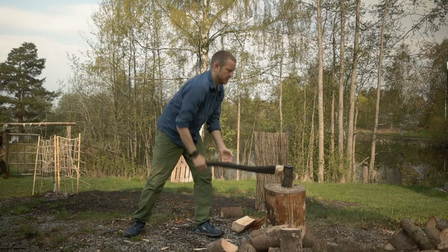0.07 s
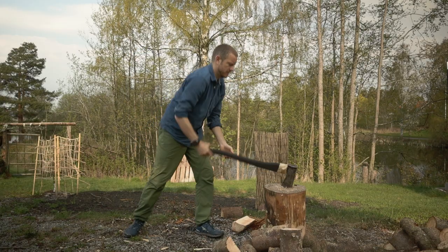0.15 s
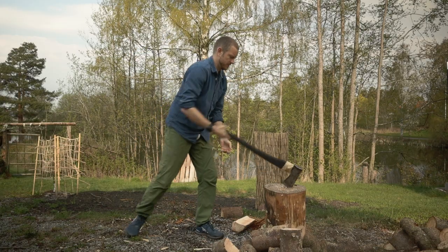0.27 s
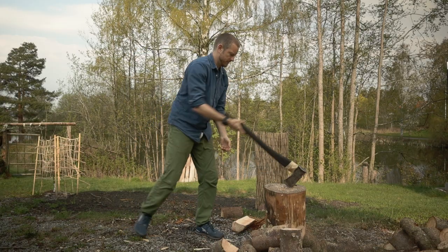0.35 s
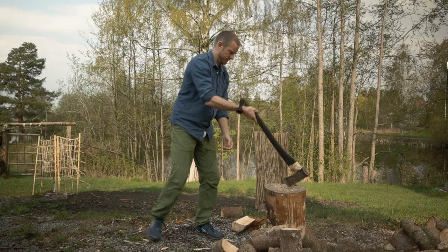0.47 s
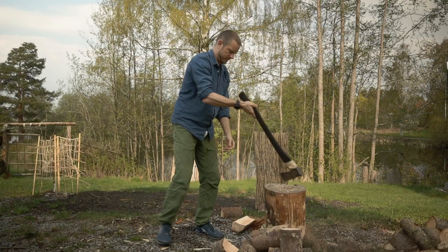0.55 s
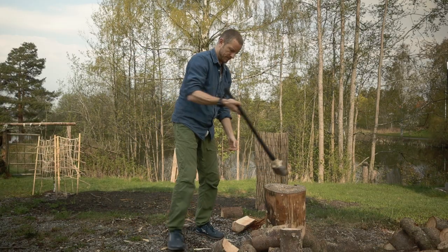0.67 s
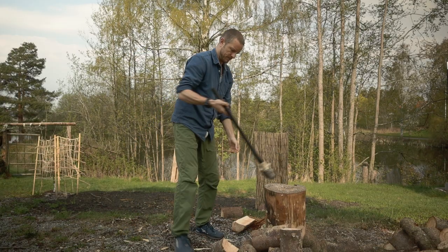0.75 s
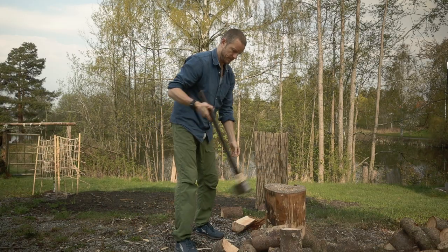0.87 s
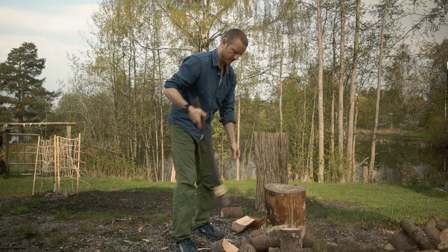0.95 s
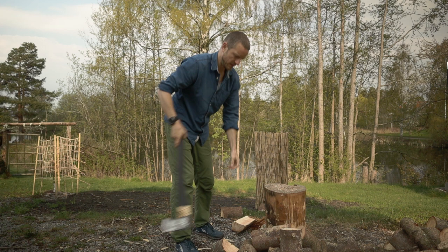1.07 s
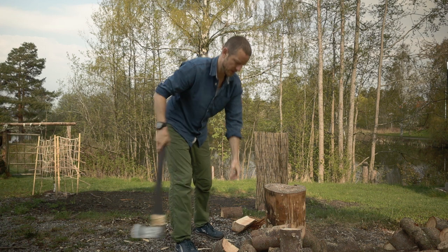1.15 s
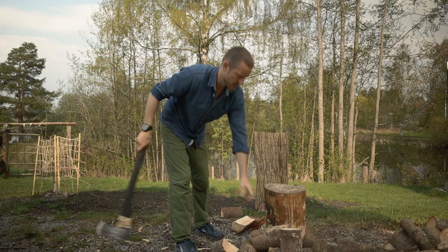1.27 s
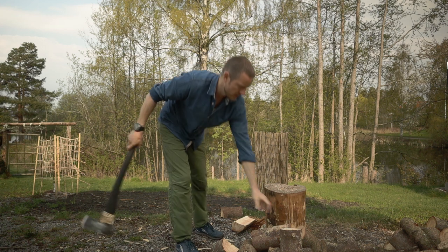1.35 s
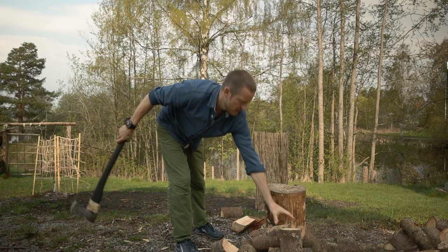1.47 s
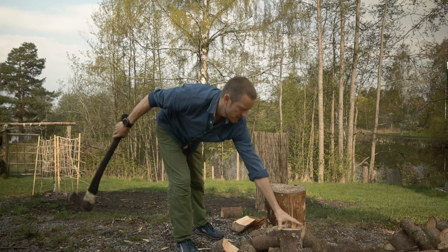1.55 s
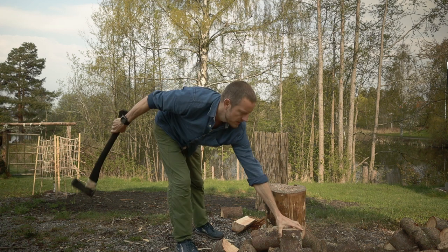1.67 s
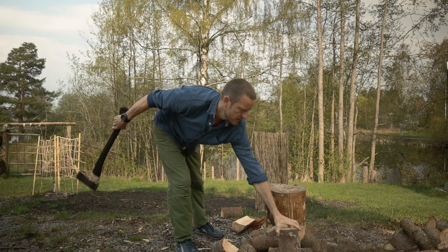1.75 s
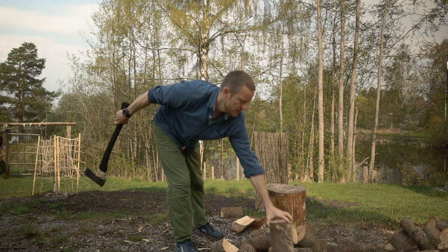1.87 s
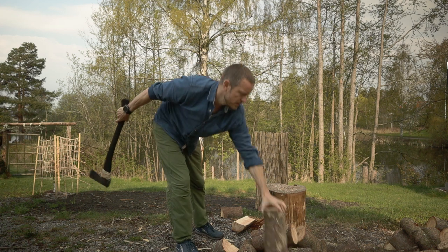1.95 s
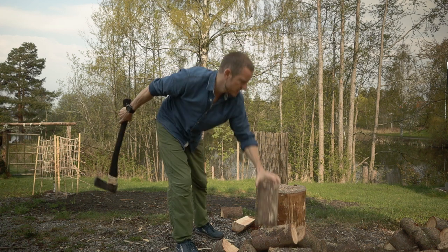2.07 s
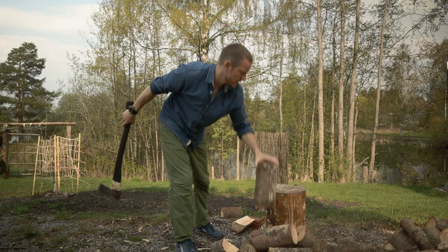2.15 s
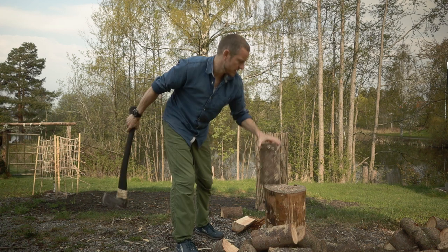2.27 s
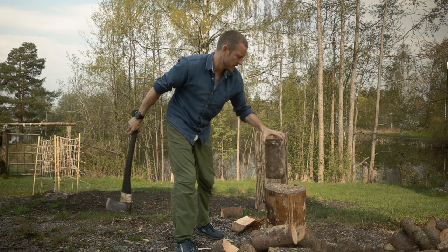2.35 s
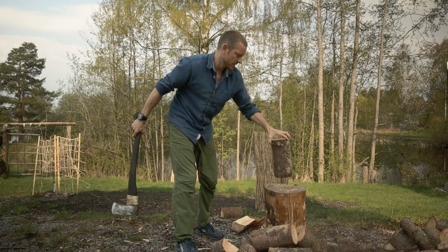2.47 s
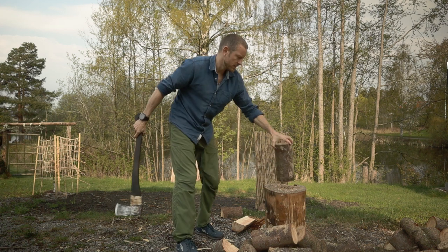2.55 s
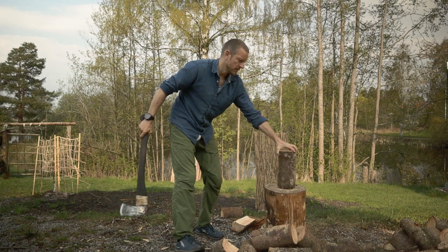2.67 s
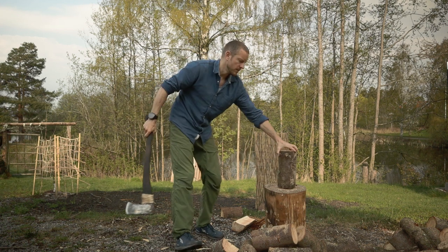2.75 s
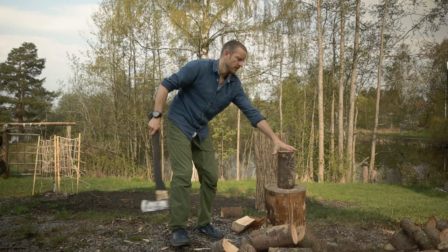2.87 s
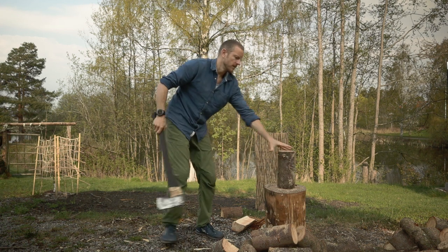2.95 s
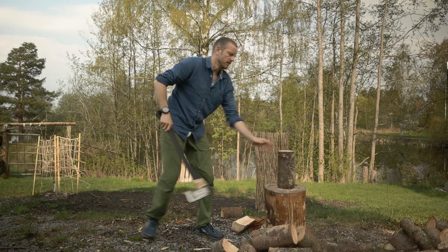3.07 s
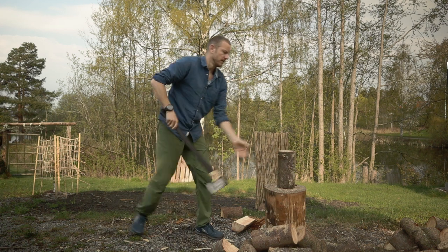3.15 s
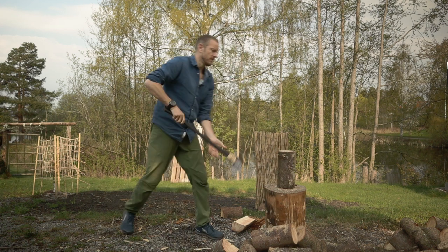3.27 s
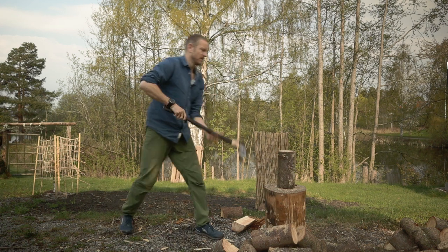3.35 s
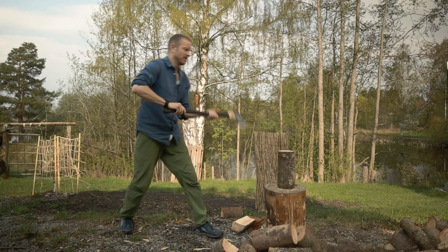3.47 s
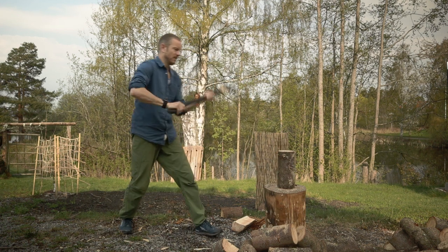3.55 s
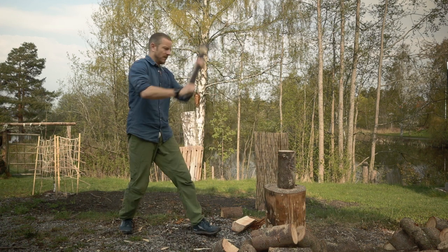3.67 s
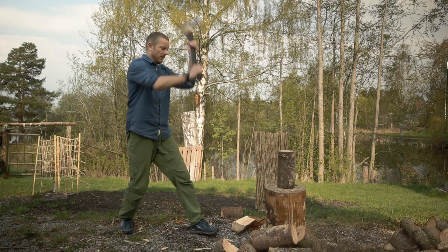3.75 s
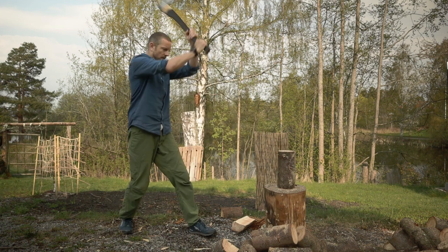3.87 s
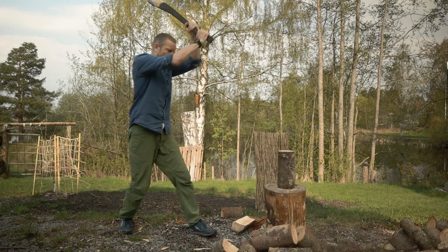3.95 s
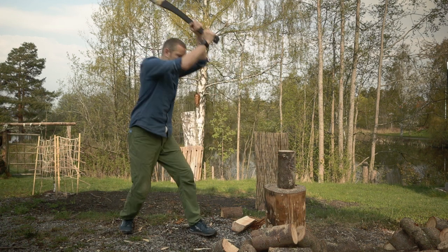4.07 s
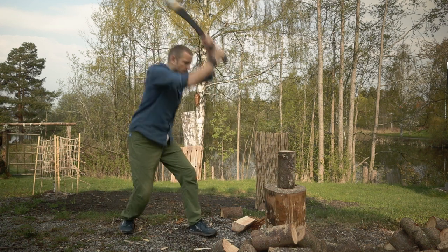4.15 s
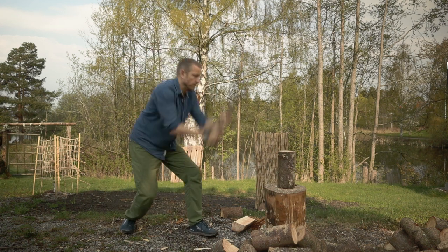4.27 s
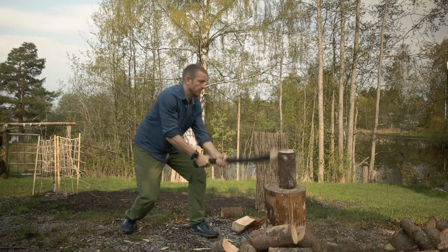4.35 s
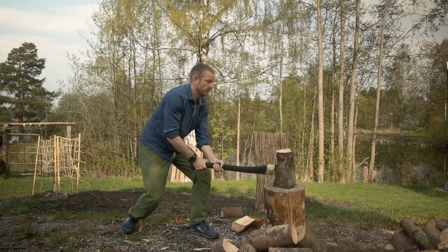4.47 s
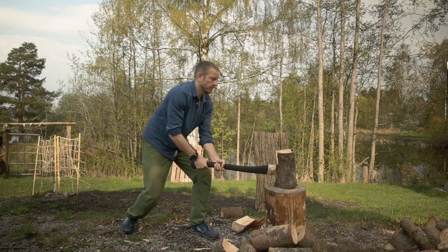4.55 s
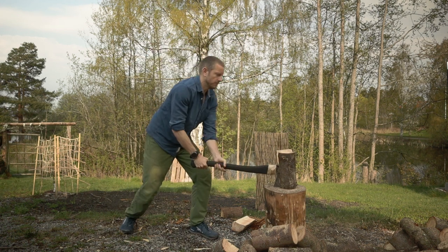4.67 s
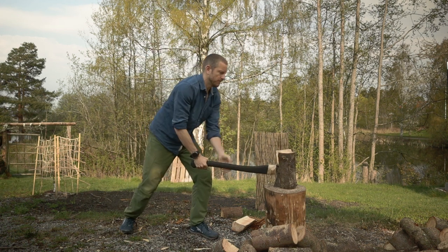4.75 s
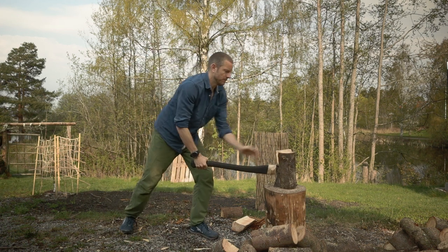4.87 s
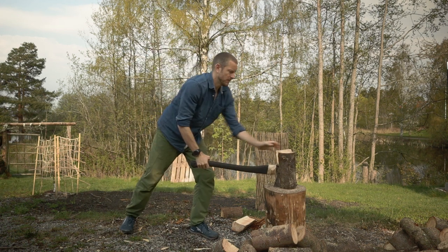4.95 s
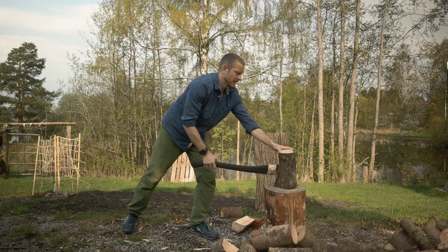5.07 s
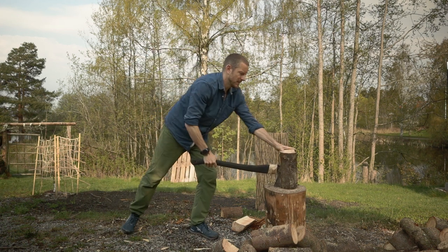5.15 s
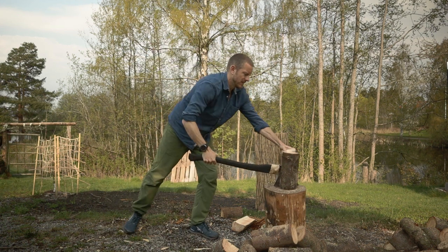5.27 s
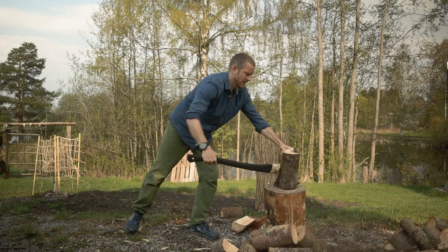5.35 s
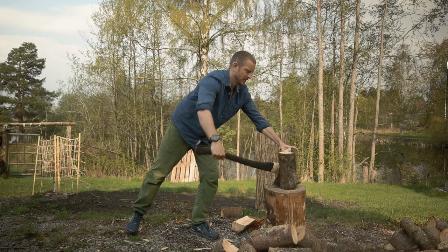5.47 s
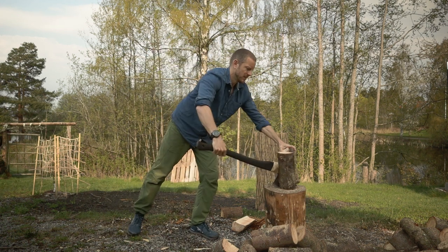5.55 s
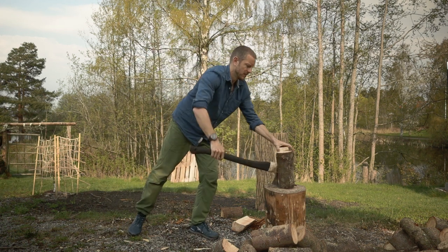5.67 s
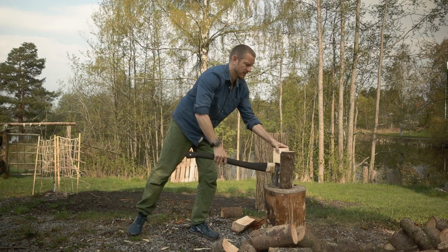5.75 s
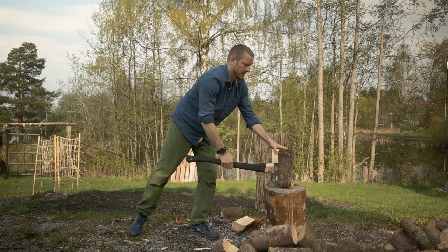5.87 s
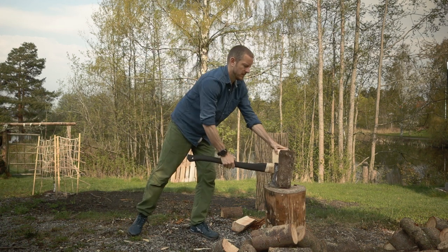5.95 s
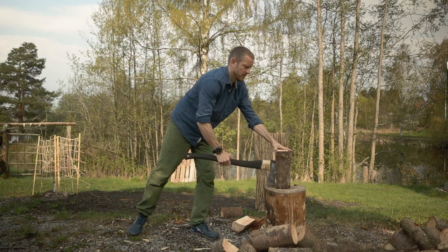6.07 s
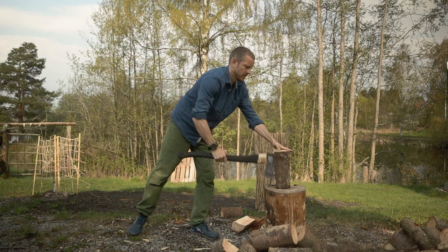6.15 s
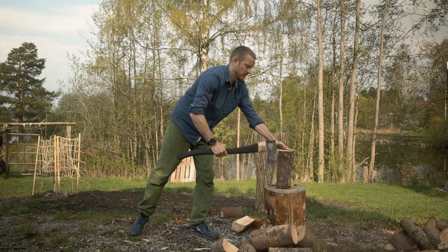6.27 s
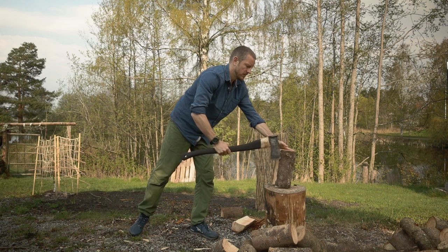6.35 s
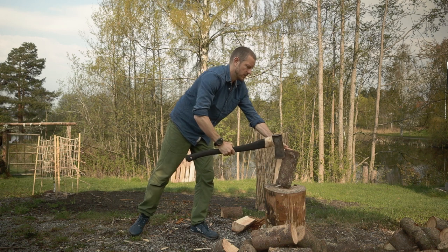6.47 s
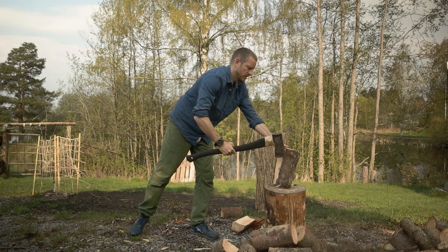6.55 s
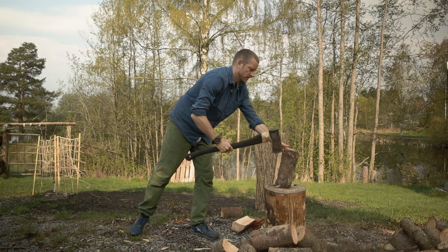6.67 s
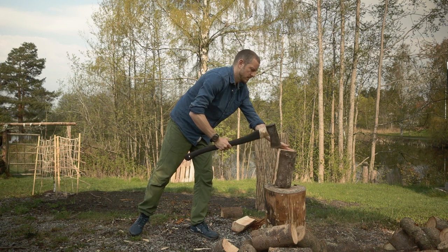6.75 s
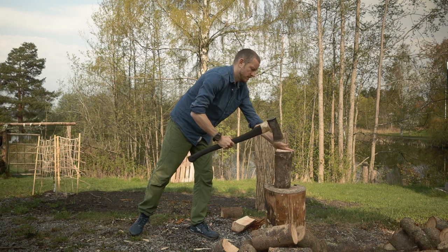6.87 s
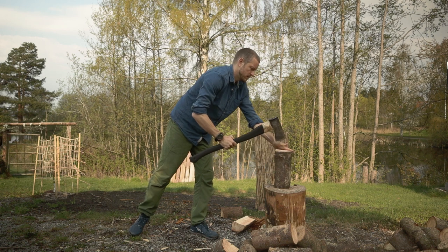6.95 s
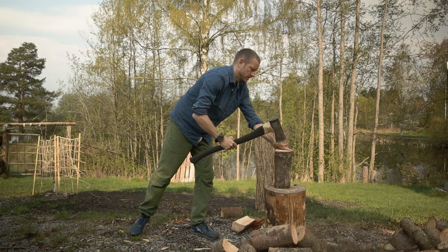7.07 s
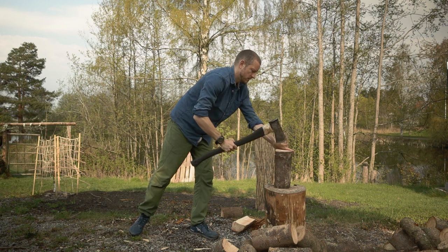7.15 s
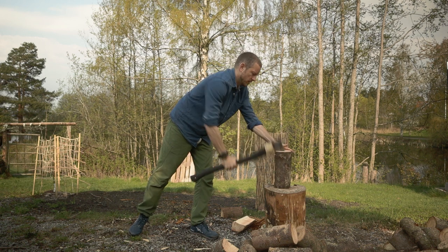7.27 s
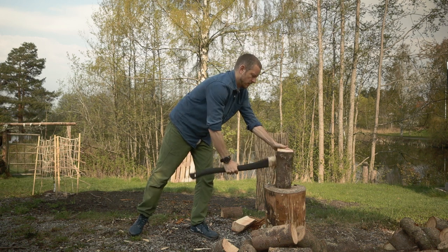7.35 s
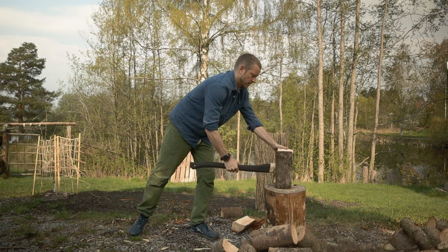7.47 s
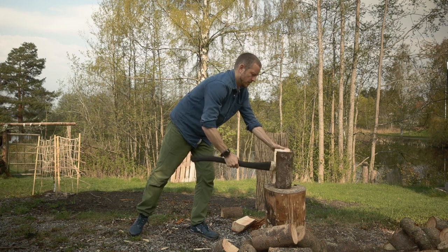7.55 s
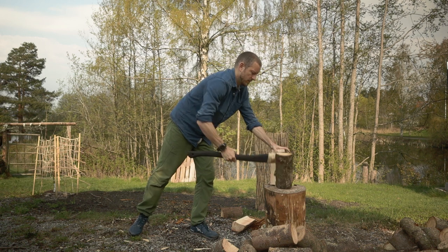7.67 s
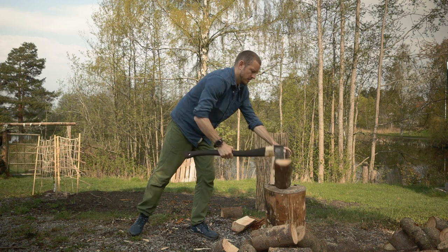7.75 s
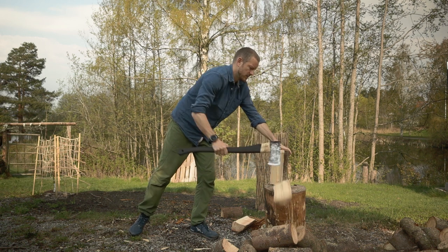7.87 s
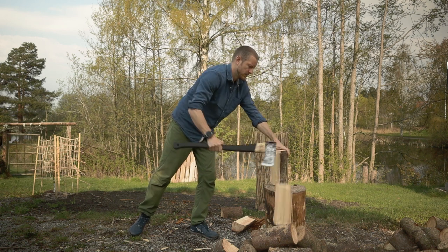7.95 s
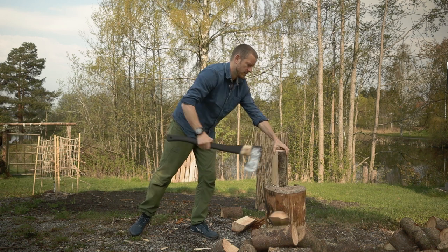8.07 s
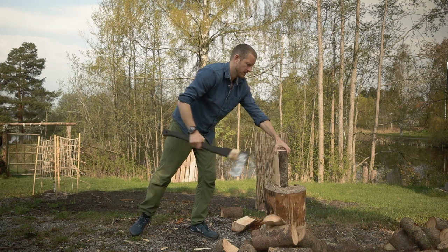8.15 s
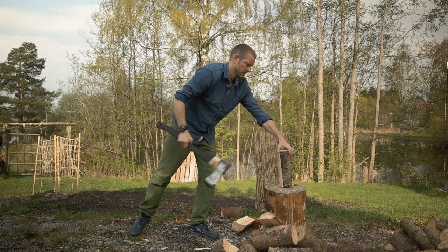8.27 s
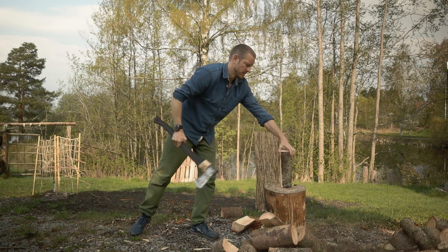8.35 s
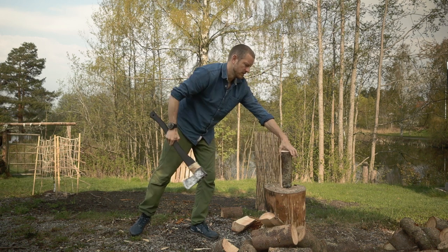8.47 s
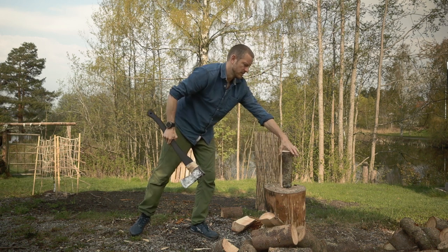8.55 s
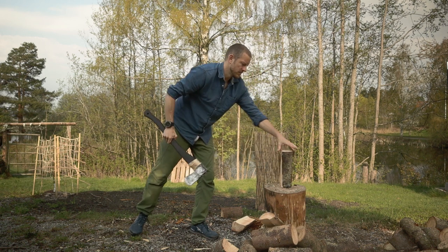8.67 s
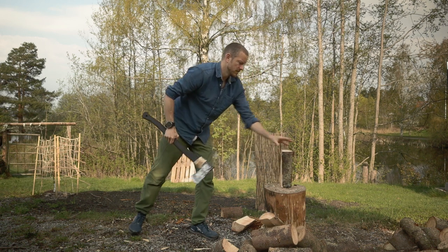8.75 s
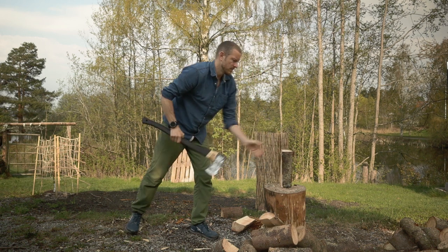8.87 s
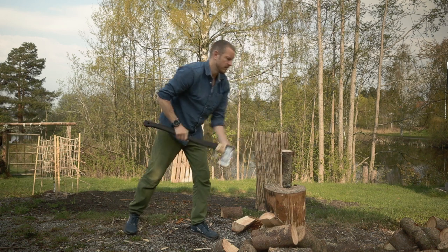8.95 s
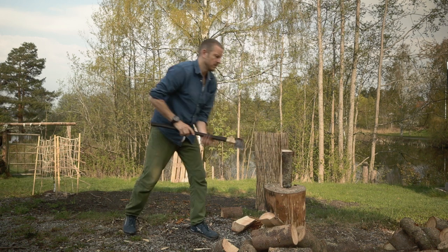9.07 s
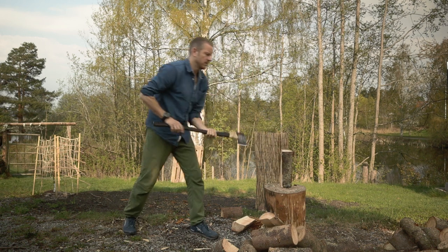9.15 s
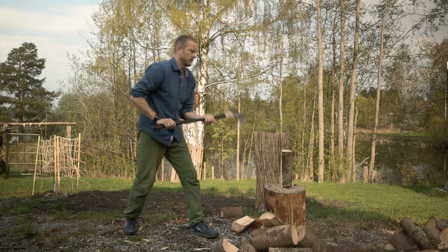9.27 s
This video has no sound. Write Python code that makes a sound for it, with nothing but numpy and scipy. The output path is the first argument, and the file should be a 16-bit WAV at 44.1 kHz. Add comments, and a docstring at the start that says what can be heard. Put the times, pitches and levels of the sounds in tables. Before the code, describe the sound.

Outdoors at a woodland edge, small songbirds chirp and twitter constantly over a low distant rumble. Clothes and bark rustle softly, a log is set down with a muted knock, then an axe lands with one very loud, dry crack and crackling splinters. After a pause a quieter double knock drives it through, and the halves clack lightly. Mono microphone, wood fairly close, slight echo from the trees.

```python
"""A man splits firewood at the edge of a wood: the axe knocks, cracks and thuds into a log standing on its block,
is worked loose and knocks the log through, and the halves clack. Each knock is a pressure swing ringing wood modes;
the bite, splinters and snaps are short noise bursts or decaying tones. Clothes, bark and grit rustle as shaped noise.
Songbirds whistle gliding sines, near and far among echoing trunks, over a distant rumble, a faint engine
and gusts on the microphone, both of coloured noise."""
import sys
import numpy as np
from scipy import signal
from scipy.fft import rfft, irfft, next_fast_len
from scipy.io import wavfile
from scipy.ndimage import map_coordinates

SR = 44100
rng = np.random.default_rng(int(sys.argv[2]) if len(sys.argv) > 2 else 0)


def materialize(psi):
    """Save the field psi as 16-bit PCM at rate SR to the path in sys.argv[1].

    A 1-D psi becomes a single channel; in a 2-D psi each row is a channel.
    """
    bounded = np.clip(np.atleast_2d(psi).T, -1, 1)
    quanta = np.round(bounded * 32767).astype(np.int16)
    wavfile.write(sys.argv[1], SR, quanta)


N = 410571  # length in samples

# echo among the trunks: (frequency [Hz], t60 [s])
FOREST = [(2000, .5), (6000, 0.86)]

# kinds of bird syllable: (length [s], repeat period [s], tune [multiples of the pitch], rasp [share of the pitch])
SWOOP = (.075, .056, [1.3, .97, .8], .008)
BOW = (.08, .603, [.88, .99, .99, .83], .006)
HOOK = (.045, .087, [.84, .98, 1], .005)
ARCH = (.095, .111, [.8, .98, .98, .77, .64], .008)
HUMP = (.058, .08, [.8, 1, .84], .005)
FLICK = (.038, .176, [.9, 1, .78], .015)
DIP = (.09, .296, [1.22, 1.08, 1, 1.07], .005)
FALL = (.05, .241, [1.28, 1, .8], .008)
SLUR = (.09, .247, [.9, 1, 1.07], .003)
HELD = (.065, .12, [.99, 1, .97], .004)
CHIP = (.019, .139, [1.13, 1.06, .76], .05)
PIP = (.018, .138, [1.03, 1, .95], .025)
WHISTLE = (.105, .2, [.96, .995, 1, .99, .87], .004)


def amp(db):
    """Decibels to a linear factor."""
    return 10 ** (np.asarray(db) / 20)


def unit(x):
    """Scale to an rms of 1."""
    return x / np.sqrt(np.mean(x ** 2) + 1e-20)


def along(points, hz):
    """Read (frequency, value) points at the given frequencies on a log axis."""
    f, v = np.transpose(points)
    return np.interp(np.log(hz + 1), np.log(f + 1), v)


def curve(rows):
    """One value per sample from (time, value) rows."""
    return np.interp(np.arange(N) / SR, *np.transpose(rows))


def seconds(length):
    """Sample times from 0 to the given length [s]."""
    return np.arange(int(length * SR)) / SR


def wobble(rate, size=N):
    """A smooth random curve with rate knots a second."""
    knots = rng.standard_normal(int(size * rate / SR) + 4)
    return map_coordinates(knots, [np.arange(size) * rate / SR])


def noise(colour, size=N):
    """Noise of rms 1 with the given spectrum."""
    m = next_fast_len(size)
    spectrum = rfft(rng.standard_normal(m)) * amp(along(colour, np.fft.rfftfreq(m, 1 / SR)))
    return unit(irfft(spectrum, m)[:size])


def add(track, s, sound):
    """Mix a sound into the track at s seconds."""
    start = max(round(s * SR), 0)
    part = track[start:start + len(sound)]
    part += sound[:len(part)]


def fade(t, t60):
    """Exponential decay that falls 60 dB in t60 seconds."""
    return np.exp(-np.log(1000) * t / t60)


def echo(x, decay):
    """Scattered reflections as a noise tail in which each frequency dies at its own speed."""
    hz, t, z = signal.stft(rng.standard_normal(SR // 2), SR, nperseg=256)
    dying = z * amp(-60 * t / along(decay, hz)[:, None])
    tail = signal.istft(dying, SR, nperseg=256)[1]
    delayed = np.pad(tail, (SR // 200, 0))  # the first reflection is 5 ms late
    return signal.fftconvolve(x, delayed / np.linalg.norm(tail))[:N]


def rumble(level_db, sway_db):
    """Distant rumble: low-heavy noise whose level sways slowly."""
    # spectrum of the air: (frequency [Hz], relative level [dB])
    air_colour = [(12, -30), (20, -1.5), (74, -2), (142, -3.5), (277, -10.5), (607, -15.5), (897, -18.5),
                  (1710, -35.5), (1960, -35), (3160, -36), (3840, -33), (4940, -45.5), (11800, -58.5),
                  (13500, -74), (16000, -75)]
    return amp(level_db + sway_db * wobble(2.8)) * noise(air_colour)


def engine():
    """The drone of a far engine: noise in narrow bands, rising and sinking."""
    # (time [s], level [dB])
    drone_level = [(0, -57), (1.8, -64.5), (2.3, -55), (3, -58), (3.7, -55), (5, -57.5), (5.6, -67.5),
                   (9.31, -66)]
    # (frequency [Hz], relative level [dB])
    drone_colour = [(100, -49.5), (138, -13), (150, 1.5), (164, -13), (220, -45.5), (580, -45.5),
                    (612, -12.5), (645, -44), (1500, -100)]
    return amp(curve(drone_level)) * noise(drone_colour)


def wind(gust_db):
    """Gusts on the microphone: very low noise that swells and sinks."""
    # (time [s], level before gust_db [dB])
    gust_level = [(0.0, -64), (0.44, -52), (1.09, -55), (1.3, -31), (1.68, -57), (2.07, -40), (2.9, -38),
                  (3.29, -49), (3.6, -36), (4.67, -54), (5.57, -44), (5.78, -60), (6.14, -49), (9.31, -56)]
    # (frequency [Hz], relative level [dB])
    gust_colour = [(2, -10), (5, 0.5), (12, -3), (22, -17.5), (40, -36), (150, -90)]
    return amp(curve(gust_level) + gust_db) * noise(gust_colour)


def whistle(hz, waver=0.0035):
    """A pure, slightly unsteady tone that swells and fades along a pitch curve."""
    size = len(hz)
    phase = 2 * np.pi * np.cumsum(hz * (1 + waver * wobble(450, size))) / SR
    swell = signal.windows.tukey(size, .3)
    return np.sqrt(2) * np.sin(phase) * swell * amp(1.2 * wobble(90, size))


def glide(length, *pitches):
    """A smooth pitch curve through evenly spaced pitches."""
    tune = np.polyfit(np.linspace(0, 1, len(pitches)), pitches, len(pitches) - 1)
    return np.polyval(tune, seconds(length) / length)


def syllable(kind, hz):
    """One note of the given kind at the given pitch."""
    length, _, tune, rasp = kind
    return whistle(hz * glide(length, *tune), rasp)


def far_birds(centre_hz, spread, bend, level_db, haze_db, direct_db, count=400):
    """Many quick far chirps with their forest echo, and the farthest song blurred into a haze of noise."""
    # swell of the far chorus: (time [s], relative level [dB])
    chorus_level = [(0, -58.5), (1.2, -60), (2.1, -66), (4.2, -66), (4.6, -56.5), (5.7, -61), (7, -66),
                    (8.2, -58), (8.9, -66)]
    # the farthest song: (frequency [Hz], relative level [dB])
    haze_colour = [(1500, -39.5), (2000, -13.5), (2350, -2), (2900, -4.5), (3500, 0), (4100, -5.5),
                   (4700, -8.5), (5500, -11), (6200, -31), (9000, -70.5)]
    out = np.zeros(N)
    for k, (when, length, pitch, *turns) in enumerate(rng.uniform(-1, 1, (count, 6))):
        pitches = centre_hz * np.exp(spread * pitch + bend * np.array(turns))
        chirp = whistle(glide(0.025 * np.exp(.6 * length), *pitches))
        add(out, (k + when) * N / SR / count, chirp)
    chirps = amp(level_db) * unit(amp(direct_db) * out + echo(out, FOREST))
    return amp(curve(chorus_level)) * (chirps + amp(haze_db) * noise(haze_colour))


def thin_caller(direct_db, echo_db):
    """A high, thin call from deep among the trunks, mixed with their echo."""
    # (time [s], relative level [dB])
    calls = [(.68, -71), (1.78, -69), (4.14, -67), (4.87, -70), (7.929, -69), (8.04, -68), (9.115, -66)]
    out = np.zeros(N)
    for s, db in calls:
        add(out, s, amp(db) * whistle(glide(.05, 5150, 5500, 5450)))
    return amp(direct_db) * out + amp(echo_db) * echo(out, FOREST)


def twitter(low_hz, chip_hz, beat_s, chip_lag_s, spread):
    """A warbler's quick bouts: every beat is a low pip and then a rasping downward chip."""
    # (time [s], beats, relative level [dB])
    bouts = [(.035, 1, -59), (.38, 1, -57), (.44, 1, -61), (.73, 3, -56), (1.105, 2, -58), (1.205, 1, -56),
             (1.53, 3, -56)]
    out = np.zeros(N)
    for s, beats, db in bouts:
        detune = np.exp(spread * rng.standard_normal((beats, 2)))
        for k, (low, high) in enumerate(detune):
            beat = s + k * beat_s
            add(out, beat, amp(db - 2.5) * syllable(PIP, low_hz * low))
            add(out, beat + chip_lag_s, amp(db) * syllable(CHIP, chip_hz * high))
    return out


def songbirds(trill_rate, trill_depth_hz):
    """The nearer birds: each phrase repeats one syllable at its own pace; trills rise with a fast vibrato."""
    # (time [s], syllable, repeats, pitch [Hz], relative level [dB])
    phrases = [(0, CHIP, 1, 3400, -60), (.16, FALL, 1, 2700, -60), (.185, CHIP, 1, 3600, -62),
               (.285, FLICK, 1, 3500, -58), (.32, FLICK, 1, 3700, -57), (.355, PIP, 1, 3400, -59),
               (.54, FLICK, 1, 3620, -58), (.568, FLICK, 1, 3700, -58), (.585, HELD, 1, 3380, -58),
               (.715, SWOOP, 1, 2600, -60), (.735, CHIP, 1, 3750, -56), (.82, FLICK, 1, 3550, -56),
               (.845, HELD, 1, 3400, -59), (1.02, HOOK, 1, 3200, -63), (1.055, FLICK, 1, 3600, -60),
               (1.105, FLICK, 1, 3500, -58), (1.245, SLUR, 1, 3600, -59), (1.365, DIP, 1, 3050, -63),
               (1.46, HELD, 2, 3680, -62), (1.755, SWOOP, 2, 2650, -63), (1.965, HOOK, 1, 3550, -57),
               (2.065, CHIP, 6, 3320, -55.5), (2.143, PIP, 4, 2560, -60), (2.18, FALL, 1, 3200, -60),
               (2.21, FLICK, 1, 4100, -60), (2.625, DIP, 1, 3020, -59), (2.692, FLICK, 1, 3800, -59),
               (2.92, CHIP, 1, 3500, -60), (2.98, SLUR, 1, 3720, -61), (3.003, PIP, 1, 2850, -61),
               (3.13, DIP, 2, 3490, -57), (3.225, CHIP, 1, 3600, -58), (3.238, FLICK, 1, 4100, -55),
               (3.308, PIP, 1, 3250, -54), (3.55, HOOK, 6, 3900, -53.5), (3.583, HELD, 1, 3030, -60),
               (3.69, FALL, 1, 3200, -59), (3.75, HELD, 1, 3380, -55.5), (3.81, SWOOP, 1, 2800, -61),
               (3.955, FALL, 1, 3500, -57), (4.025, HELD, 1, 3280, -60), (4.088, FLICK, 1, 4400, -59),
               (4.11, FALL, 1, 3800, -59), (4.247, HELD, 1, 2950, -54), (4.29, FLICK, 1, 3900, -57),
               (4.33, DIP, 1, 3200, -60), (4.385, HOOK, 5, 3950, -54.5), (4.525, HELD, 1, 2800, -56),
               (4.68, FLICK, 1, 4050, -54), (4.72, SLUR, 1, 3200, -58), (4.795, FLICK, 1, 4280, -53),
               (4.828, FLICK, 1, 4450, -52), (4.875, FALL, 1, 3400, -57), (4.925, HELD, 1, 3460, -57),
               (5.03, HOOK, 1, 3550, -60), (5.075, FALL, 1, 3200, -57), (5.137, ARCH, 4, 3620, -56.5),
               (5.625, HUMP, 1, 4000, -58), (5.79, FLICK, 3, 4000, -56.5), (5.822, ARCH, 4, 3620, -57),
               (6.26, WHISTLE, 1, 4310, -53.5), (6.433, FLICK, 1, 4350, -56), (6.475, HOOK, 1, 5450, -58),
               (6.53, SWOOP, 1, 2850, -64), (6.565, HUMP, 1, 5450, -62), (6.588, FLICK, 1, 4950, -56),
               (6.586, HUMP, 3, 3130, -56), (6.865, HELD, 1, 3060, -58), (6.91, HELD, 1, 2770, -56),
               (7.055, SWOOP, 1, 2950, -61), (7.128, SLUR, 2, 2900, -51), (7.25, FLICK, 1, 3280, -49),
               (7.262, CHIP, 1, 3900, -56), (7.292, FALL, 1, 2950, -53), (7.32, HUMP, 1, 3100, -55),
               (7.513, FLICK, 1, 4250, -52), (7.528, FALL, 1, 3350, -53), (7.555, HELD, 1, 3580, -55),
               (7.645, SWOOP, 1, 2750, -60), (7.715, CHIP, 1, 3700, -50), (7.765, FLICK, 1, 3700, -51),
               (7.892, HUMP, 1, 3220, -51.5), (7.893, FLICK, 1, 4700, -56), (7.935, HELD, 1, 3660, -54),
               (7.998, HUMP, 1, 3150, -51.5), (8.055, FALL, 1, 3100, -56), (8.145, SWOOP, 1, 2900, -52),
               (8.532, BOW, 2, 3320, -53), (8.64, SWOOP, 1, 3000, -62), (8.73, HELD, 5, 2340, -71),
               (9.02, FLICK, 1, 4200, -64)]
    # rising trills: (time [s], length [s], start [Hz], middle [Hz], end [Hz], relative level [dB])
    trills = [(6.772, 0.19, 2900, 3580, 3794, -57.5), (7.503, 0.15, 3160, 3580, 3810, -59),
              (8.059, 0.25, 2930, 3485, 3756, -56.5), (8.613, .22, 3480, 3810, 3950, -59.5),
              (9.19, .14, 3500, 3790, 3920, -59.5)]
    out = np.zeros(N)
    for s, kind, repeats, hz, db in phrases:
        period = kind[1]
        for k in range(repeats):
            add(out, s + k * period, amp(db) * syllable(kind, hz))
    for s, length, *pitches, db in trills:
        vibrato = trill_depth_hz * np.sin(2 * np.pi * trill_rate * seconds(length))
        add(out, s, amp(db) * whistle(glide(length, *pitches) + vibrato))
    return out


def among_trunks(x, level_db, count):
    """Single trunks send back weak, closely spaced copies of the song."""
    out = x.copy()
    for delay, gain in zip(rng.uniform(.006, .05, count), rng.standard_normal(count)):
        add(out, delay, amp(level_db) * gain * x)
    return out


def rustle(rest_db, grain_db, tick_db, tick_t60, count=70):
    """Cloth, boots and bark rub in many tiny catches, with scattered ticks of grit; each movement swells and dies."""
    # (time of the peak [s], level at the peak [dB], rise [s per 20 dB], release [s per 20 dB])
    moves = [(.47, -66, .45, .12), (.905, -57, .06, .13), (2.0, -66, .04, .04), (2.945, -52.5, .17, .055),
             (3.11, -64, .1, .14), (3.45, -72, .15, .8), (3.935, -56.5, .18, .06), (4.51, -51, .12, .09),
             (5.378, -54.5, .025, .16), (5.68, -70, .04, .35), (6.36, -76, .5, .4), (6.64, -72, .05, .1),
             (6.77, -59, .025, .02), (7.44, -58, .07, .03), (7.492, -53, .02, .04), (8.14, -63, .03, .05),
             (8.3, -62, .04, .02), (9.31, -65, .3, .1)]
    # (frequency [Hz], relative level [dB])
    rustle_colour = [(300, -9.5), (1200, 1.5), (2200, 4), (4500, 6.5), (7000, 2), (10000, -3), (15000, -8)]
    t = np.arange(N) / SR
    effort = amp(rest_db)
    for s, db, rise, release in moves:
        distance = np.maximum((s - t) / rise, (t - s) / release)
        effort = effort + amp(db - 20 * distance)
    grains = unit(amp(grain_db * (wobble(500) + .6 * wobble(60))))
    ticks = np.zeros(N)
    for when, size in rng.uniform(0, 1, (count, 2)):
        add(ticks, when * N / SR, amp(tick_db) * size ** 2 * fade(seconds(.03), tick_t60))
    return (effort * grains + ticks) * noise(rustle_colour)


def snaps():
    """Short bright ticks, each a ragged burst of breaking fibres, bark or shifting grit."""
    # (time [s], relative level [dB], t60 [s])
    snap_list = [(.518, -42, .01), (3.029, -40, .025), (3.046, -38.5, .018), (3.095, -42.5, .02),
                 (3.4, -39.5, .018), (3.9245, -42, .03), (4.4805, -33, .025), (4.4892, -27.5, .025),
                 (5.36, -41, .015), (5.369, -31.5, .028), (5.383, -39, .03), (5.425, -42, .03),
                 (5.491, -42, .015), (7.4972, -35, .02), (7.5045, -24.5, .013), (8.139, -38.5, .018),
                 (8.1605, -42, .014), (8.1693, -40.5, .014), (8.2998, -40.5, .016)]
    # (frequency [Hz], relative level [dB])
    snap_colour = [(300, -21.5), (1500, -3), (4000, -0.5), (7000, 2), (12000, -5.5), (16000, -9)]
    out, t = np.zeros(N), seconds(.06)
    for s, db, t60 in snap_list:
        ragged = unit(noise(snap_colour, len(t)) * amp(3 * wobble(900, len(t))))
        add(out, s, amp(db) * ragged * fade(t, t60) / 2)
    return out


def splinters(s, length, level_db, loss_db, centre_hz, spread, cycles, count=70):
    """Fibres keep giving way around the wedge: an uneven crackle of short tones that thins out."""
    out, t = np.zeros(N), seconds(.02)
    for when, pitch, size in rng.uniform(0, 1, (count, 3)):
        hz = centre_hz * np.exp(spread * (2 * pitch - 1))
        age = when ** 1.4  # crowds the fibres towards the start
        tone = np.sin(2 * np.pi * hz * t) * fade(t, cycles / hz)
        add(out, s + age * length, amp(level_db - loss_db * age) * size ** 2 * tone)
    return out


def bite(s, level_db, rise, t60):
    """The full swing: tearing noise swells as the wedge sinks into the grain, then stops with the blade."""
    # (frequency [Hz], relative level [dB])
    bite_colour = [(400, -21), (1500, 3), (3200, -9.5), (3700, -2.5), (4050, 5.5), (4500, -2), (5000, -3.5),
                   (5600, -5), (6700, -6.5), (7600, -7.5), (9000, -16), (12000, -11), (16000, -17)]
    out, t = np.zeros(N), seconds(.08)
    shape = np.minimum(t / rise, 1) ** 2 * fade(np.maximum(t - rise, 0), t60)
    add(out, s, amp(level_db) * shape * noise(bite_colour, len(t)))
    return out


def push(t, hz, cycles):
    """One short swing of pressure under a bell-shaped envelope; cycles sets its width."""
    turn = t * hz - 1.5 * cycles
    return 1.2 * np.sin(2 * np.pi * turn) * np.exp(-(turn / cycles) ** 2)


def knocks(contacts, modes, width_octaves, ring_db, crack_t60, thud_hz, cycles, scatter):
    """Each contact gives a pressure swing, a crack and a low thud, and rings the modes near its centre
    (harder = higher); the modes shift a little with the place of the blow."""
    # (frequency [Hz], relative level [dB])
    crack_colour = [(200, -19), (1000, -1), (2500, 3), (4000, 5), (5500, 1.5), (9000, -11), (12000, -14),
                    (16000, -14)]
    out, t = np.zeros(N), seconds(.15)
    hz, mode_db, t60 = np.transpose(modes)[:, :, None]
    side = (-1) ** np.arange(len(hz))[:, None]  # neighbouring modes start in opposite directions
    for s, knock_db, centre_hz, length, crack_db, thud_db in contacts:
        strength = amp(mode_db) / (1 + (np.log2(hz / centre_hz) / width_octaves) ** 2)
        shifted_hz = hz * (1 + scatter * rng.uniform(-1, 1, hz.shape))
        tones = np.sin(2 * np.pi * shifted_hz * t) * fade(t, t60 * length)
        ring = np.sum(side * strength * tones, axis=0)
        ring = ring * (1 - np.exp(-(t * centre_hz / 2) ** 2))  # the ring builds as the first swing ends
        ring = ring / np.sqrt(np.mean(ring[:SR // 100] ** 2))  # rms 1 over the first 10 ms
        knock = push(t, centre_hz, cycles) + amp(ring_db) * np.sqrt(length) * ring
        crack = noise(crack_colour, len(t)) * fade(t, crack_t60) / 2
        thud = push(t, thud_hz, cycles)
        add(out, s, amp(knock_db) * knock + amp(crack_db) * crack + amp(thud_db) * thud)
    return out


def clacking_halves():
    """The split halves clack together, each contact ringing the modes of a billet."""
    # (time [s], knock [dB], centre of the knock [Hz], ring length [factor], crack [dB], thud [dB]), levels relative
    clacks = [(8.1408, -38, 1550, .8, -41, -33), (8.1638, -30, 1500, .8, -44, -39),
              (8.169, -42, 1700, .7, -47, -53), (8.3018, -39.5, 1400, .8, -50, -42)]
    # modes of a half: (frequency [Hz], relative level [dB], t60 before the ring length factor [s])
    billet = [(280, -4, .05), (474, 1, .026), (845, -10, .05), (1490, 3, .035), (1690, -8, .03),
              (1960, -16, .025), (3140, -10, .027)]
    return knocks(clacks, billet, width_octaves=1.4, ring_db=-5.5, crack_t60=.025, thud_hz=260,
                  cycles=0.71, scatter=.015)


def struck_log():
    """Wood struck by axe or wood, ringing the modes of the log on its block."""
    # (time [s], knock [dB], centre of the knock [Hz], ring length [factor], crack [dB], thud [dB]), levels relative
    blows = [(2.759, -27, 703, .55, -44, -27.5), (2.765, -37, 450, 1.1, -62, -41),
             (3.922, -36.5, 725, .9, -47, -37), (4.4507, -4.1, 1458, .56, -16, -13),
             (4.4527, 0, 940, .7, -10, -15.7), (4.4681, -9.9, 1065, .71, -33, -36),
             (4.4857, -18.8, 1177, 1.3, -33, -32), (4.5052, -22.5, 1800, 1.1, -27, -35),
             (4.526, -34, 750, 1.3, -42, -38), (7.378, -38, 750, .8, -50, -47),
             (7.3955, -37, 850, .36, -49, -50), (7.4305, -19.3, 557, 1.3, -31, -41),
             (7.4357, -13.5, 690, .25, -24, -23.5), (7.437, -28, 2250, .8, -40, -50),
             (7.4464, -26.8, 733, .51, -42, -34), (7.4528, -22, 500, .36, -55, -34),
             (7.7985, -32, 790, 1.2, -48, -44), (8.0045, -48, 997, .9, -58, -43)]
    # modes of the log: (frequency [Hz], relative level [dB], t60 before the ring length factor [s])
    log_modes = [(215, -5, .04), (292, -2, .049), (471, 2, .03), (676, 0, .034), (737, -8, .03),
                 (853, -10, .036), (960, -5, .04), (1110, -4, .036), (1300, -9, .032), (1416, -5, .036),
                 (1547, -3, .027), (1967, -4, .022), (2170, -7, .028), (2600, -9, .03), (3020, -6, .035)]
    return knocks(blows, log_modes, width_octaves=1.2, ring_db=-12.5, crack_t60=.022, thud_hz=320,
                  cycles=.55, scatter=.01)


def yard_echo(wood, level_db, cutoff_hz):
    """The yard's echo of the wood, its treble swallowed by grass and foliage."""
    # (frequency [Hz], t60 [s])
    yard_decay = [(200, .24), (1500, 0.29), (5000, .2), (14000, 0.45)]
    lowpass = signal.butter(2, cutoff_hz, fs=SR, output="sos")
    return amp(level_db) * signal.sosfilt(lowpass, echo(wood, yard_decay))


def scene():
    """Mix the far air, the birds, the man's movements and the axe work into one channel."""
    background = rumble(level_db=-48, sway_db=.5) + engine() + wind(gust_db=0.5)

    song = songbirds(trill_rate=85, trill_depth_hz=210)
    song += twitter(low_hz=2430, chip_hz=3250, beat_s=.046, chip_lag_s=.01, spread=.025)
    song = among_trunks(song, level_db=-23, count=10)
    birds = amp(-.3) * song + amp(-8.5) * echo(song, FOREST)
    birds += thin_caller(direct_db=-4, echo_db=-4.5)
    birds += far_birds(centre_hz=3200, spread=.2, bend=.18, level_db=-4, haze_db=-12.5, direct_db=-1)

    moving = rustle(rest_db=-84, grain_db=4, tick_db=-62, tick_t60=.015)

    wood = struck_log() + clacking_halves() + snaps()
    wood += bite(s=4.4492, level_db=-8, rise=.0028, t60=.012)
    wood += splinters(s=4.47, length=.1, level_db=-28, loss_db=13, centre_hz=2300, spread=.45, cycles=22)
    yard = yard_echo(wood, level_db=-21, cutoff_hz=7000)
    return (background + birds + moving + wood + yard)[None]


def record(dry):
    """Peaks beyond full scale clip; a steep filter then removes what lies above the band limit."""
    top_hz = 15900
    m = next_fast_len(N + SR // 2)
    passed = 1 / (1 + (np.fft.rfftfreq(m, 1 / SR) / top_hz) ** 120)
    return irfft(rfft(np.clip(dry, -1, 1), m) * passed, m)[..., :N]


dry = scene()
out = record(dry)
materialize(out)
```